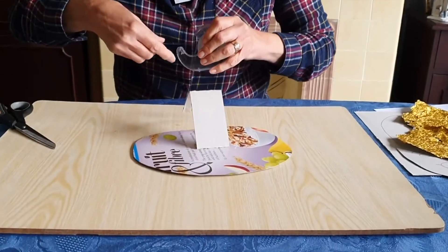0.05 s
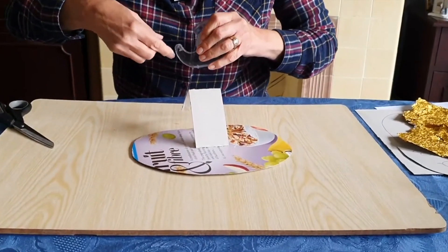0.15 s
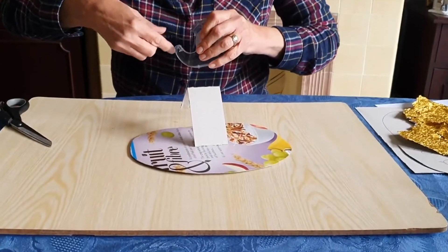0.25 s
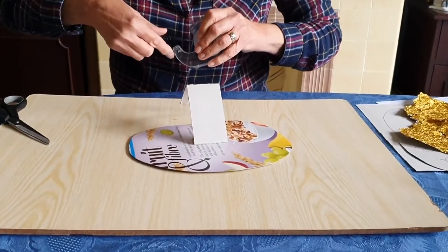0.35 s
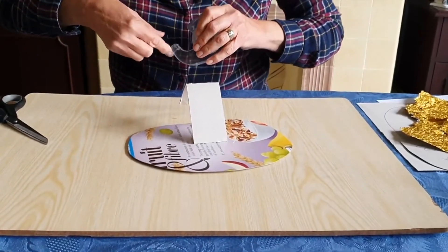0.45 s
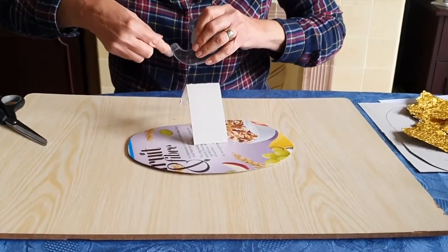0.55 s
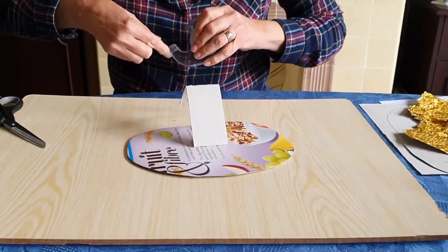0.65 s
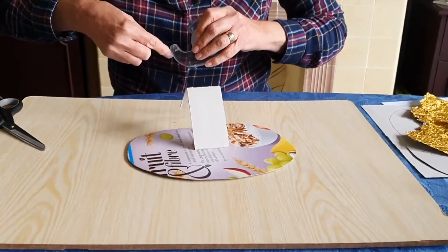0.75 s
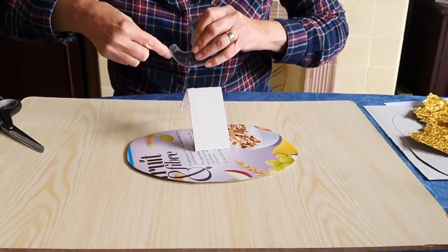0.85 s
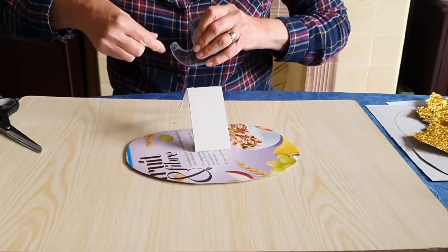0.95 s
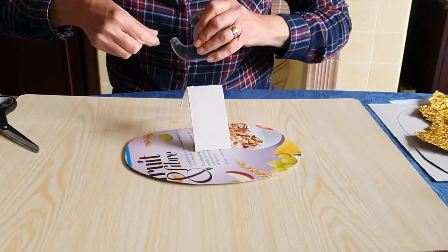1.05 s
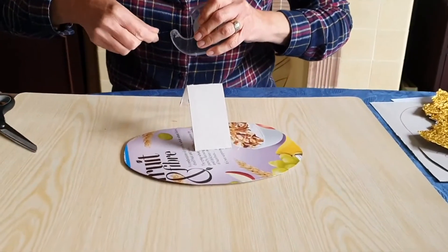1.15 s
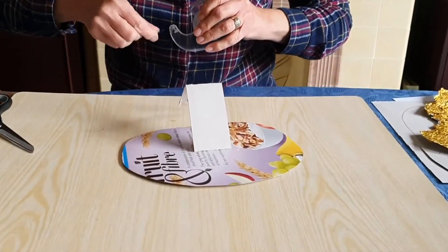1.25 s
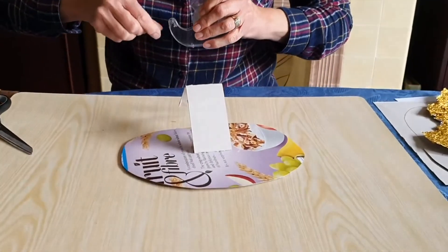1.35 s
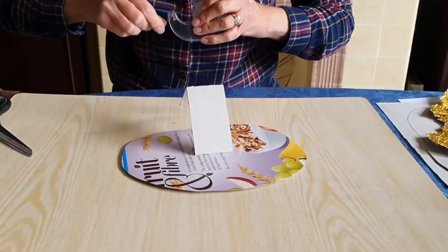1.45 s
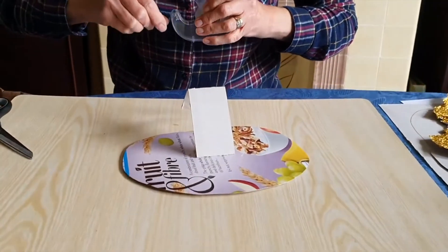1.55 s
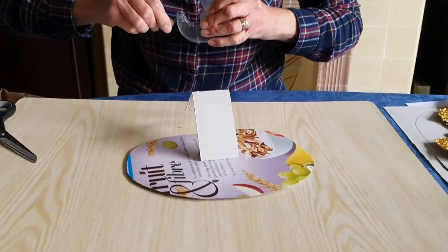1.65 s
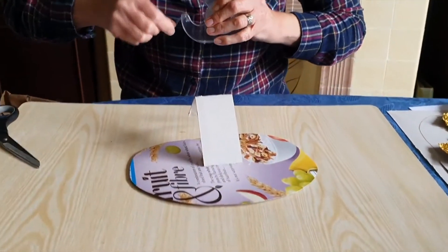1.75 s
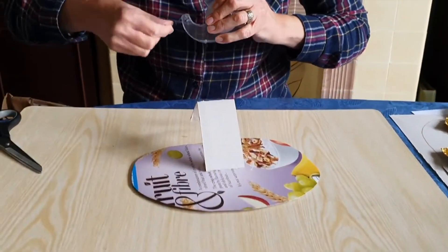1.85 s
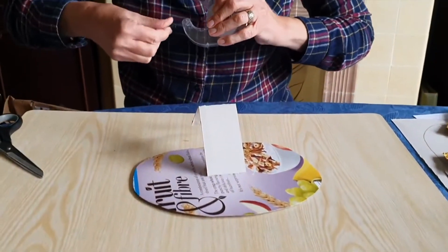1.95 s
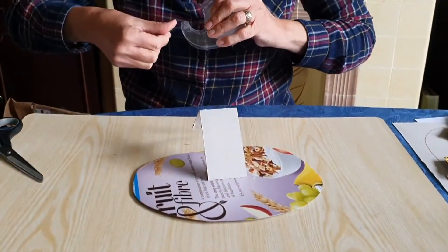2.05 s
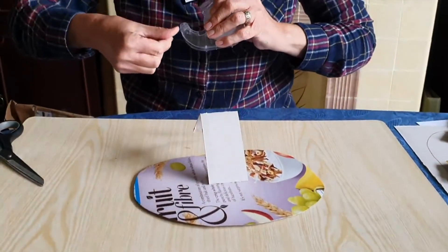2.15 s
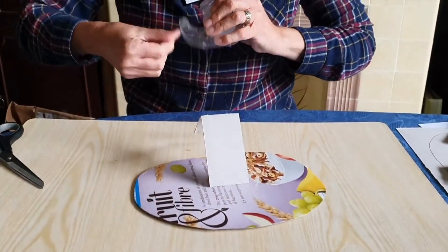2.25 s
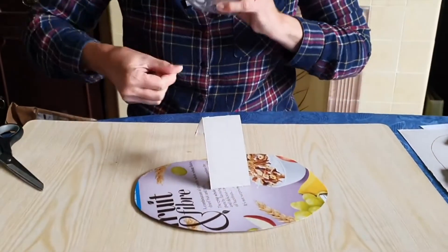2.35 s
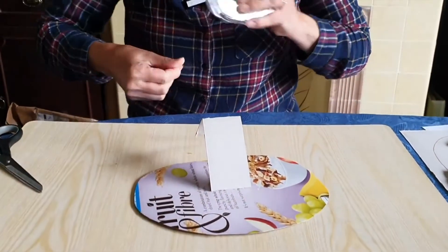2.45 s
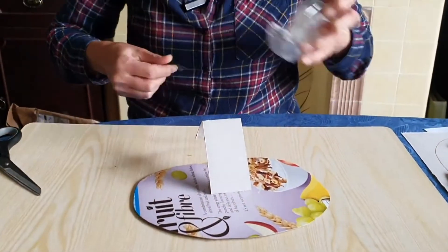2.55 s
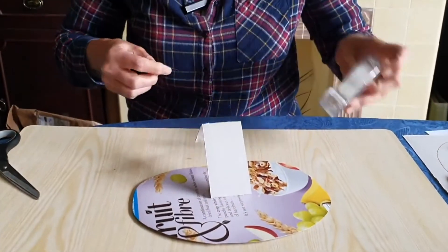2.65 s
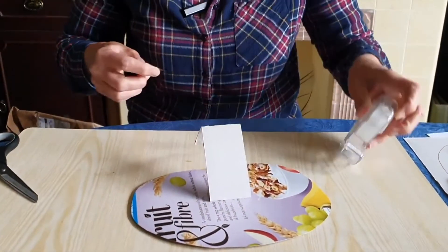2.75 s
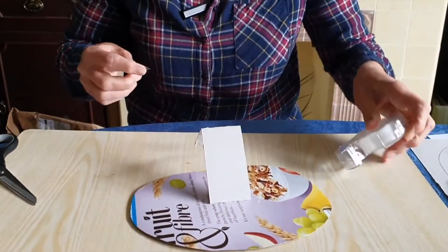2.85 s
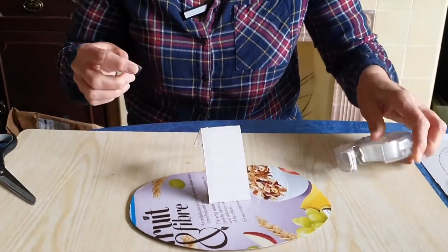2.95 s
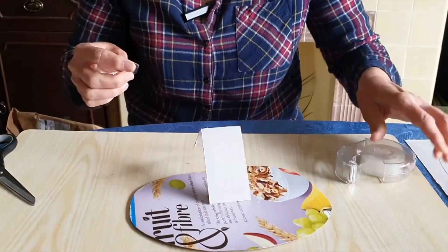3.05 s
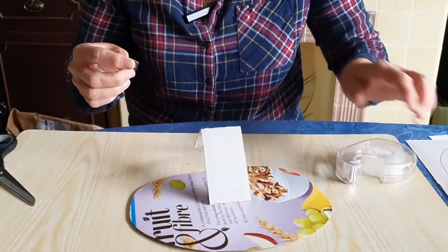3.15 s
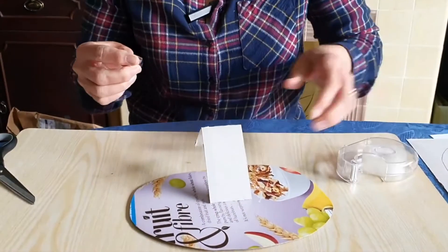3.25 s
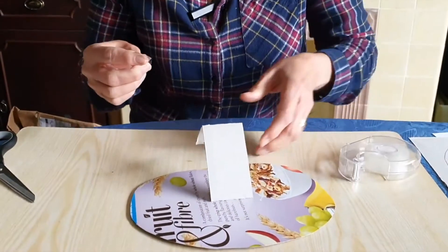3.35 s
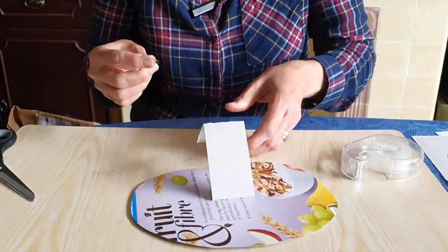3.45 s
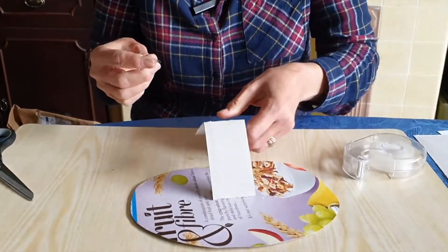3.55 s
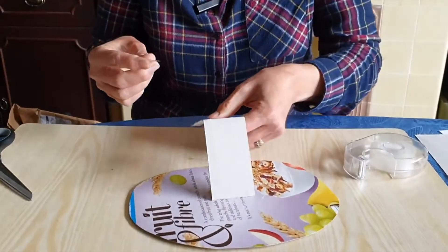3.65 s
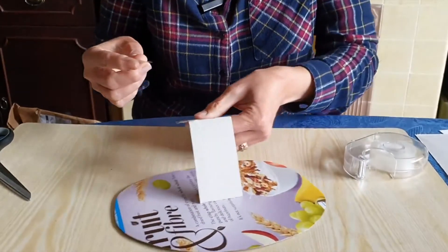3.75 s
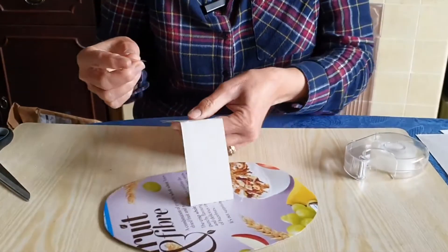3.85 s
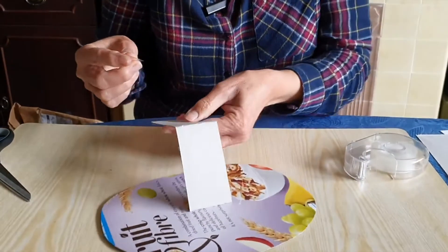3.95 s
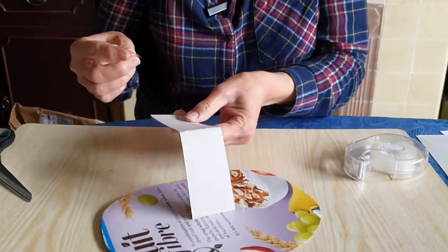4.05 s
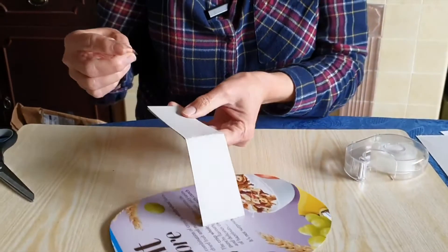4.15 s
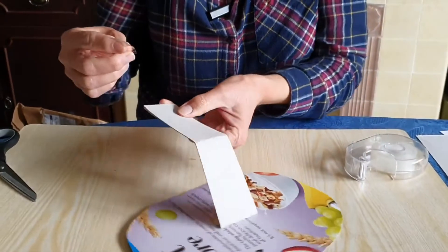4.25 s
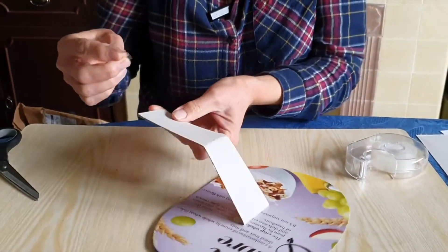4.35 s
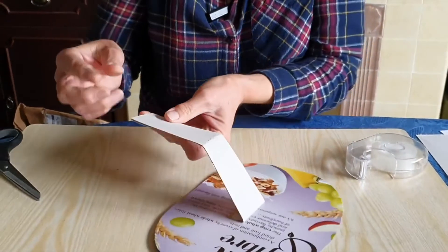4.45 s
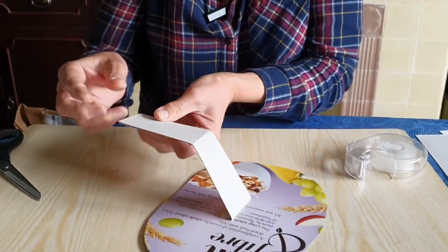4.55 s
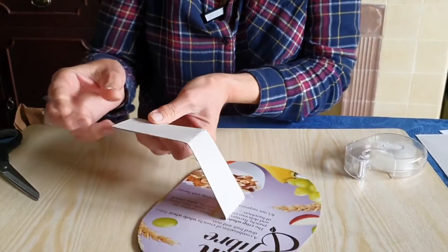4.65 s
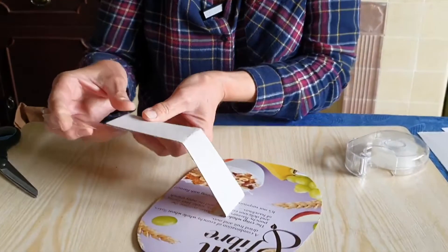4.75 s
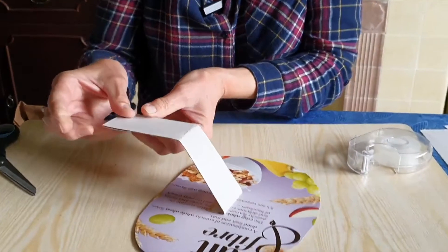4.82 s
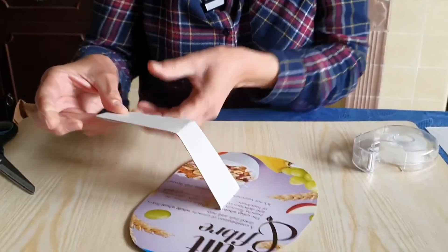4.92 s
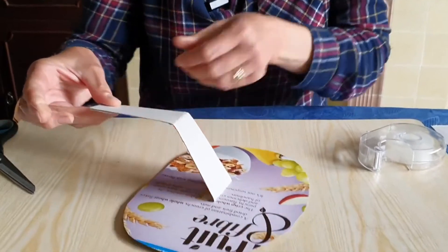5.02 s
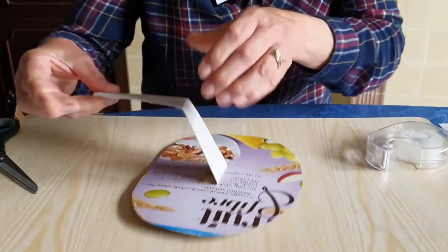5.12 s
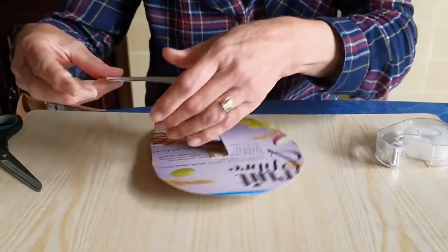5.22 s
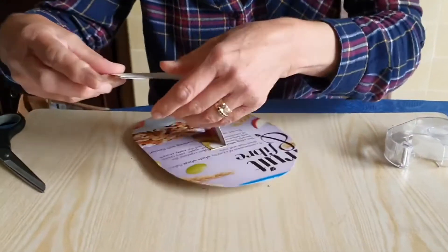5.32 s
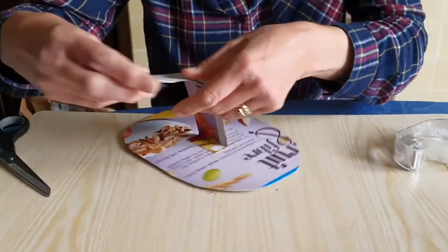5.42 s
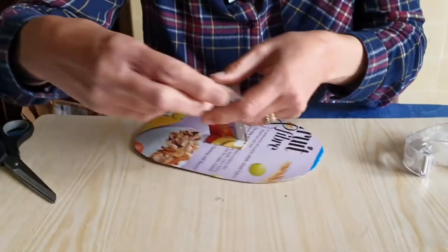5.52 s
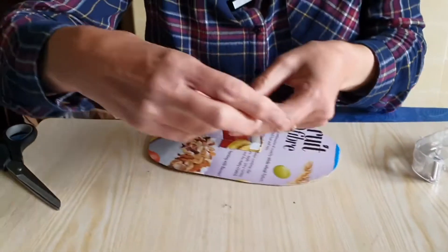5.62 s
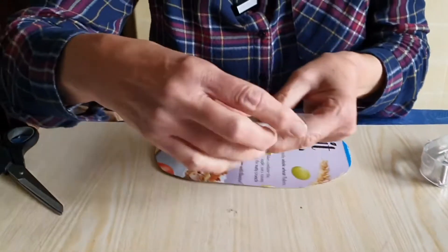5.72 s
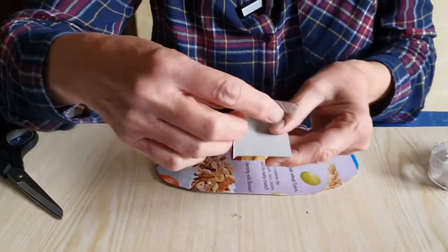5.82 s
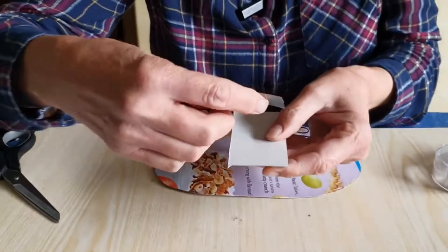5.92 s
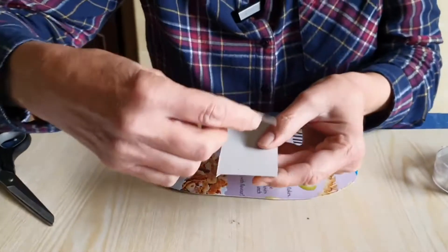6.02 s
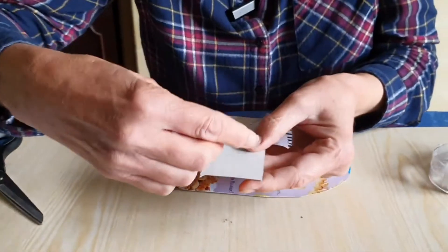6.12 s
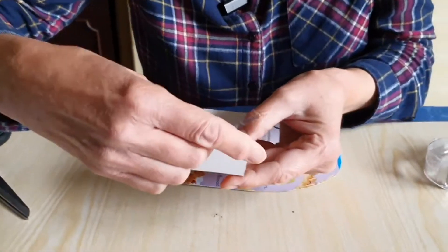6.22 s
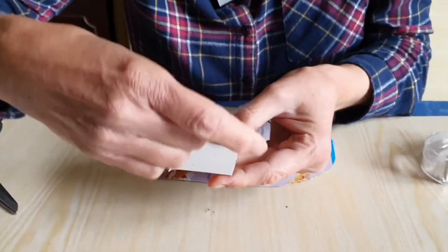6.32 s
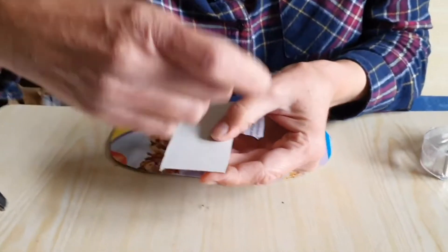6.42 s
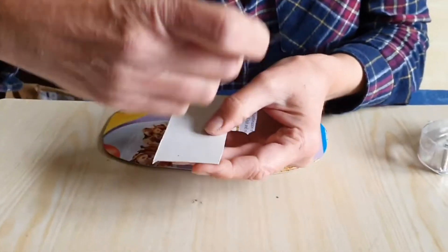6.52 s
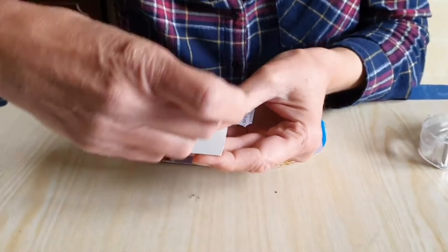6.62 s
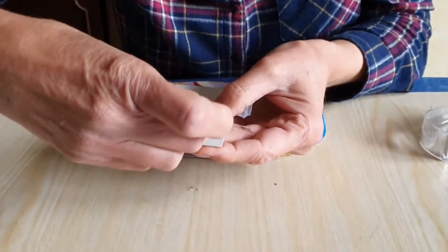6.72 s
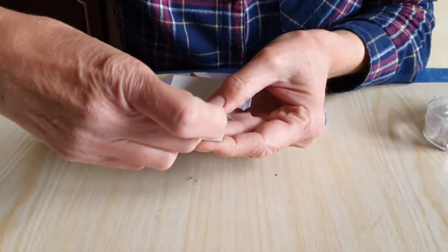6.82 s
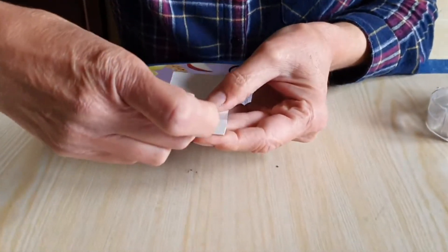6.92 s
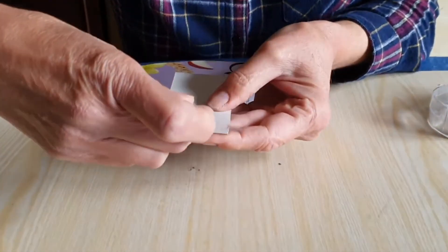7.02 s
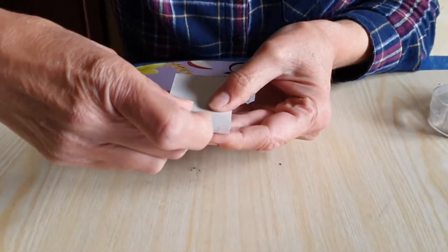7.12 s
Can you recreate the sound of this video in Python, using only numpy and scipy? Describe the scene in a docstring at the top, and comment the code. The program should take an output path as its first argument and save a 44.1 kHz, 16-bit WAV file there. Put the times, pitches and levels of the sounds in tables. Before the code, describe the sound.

In a quiet, small, lively room, heard in stereo from an arm's length, a faint tape rasp opens the scene. Fingers rub plastic with tiny squeaks and a light knock around 0.3-0.4 s, then the tape peels with a crisp, bright rasp and sharp snaps at 0.55-0.76 s. Near quiet follows, with barely audible handling from 1.7 s and a thin, high tearing snap at 2.28 s. Small plastic rattles and squeaks lead to the dispenser landing on wood: a loud, hard clack at 2.8 s, with further knocks at 2.95 and 3.04 s. From 3.7 s cardboard slides over the table in soft, dry, hissing strokes, most active at 5-5.5 s. From 5.7 s light card ticks and fingertip taps mix with dull bumps, a firmer low thud at 6.83 s, and a final tick, thud and rub around 7 s.

```python
"""A short rasp of sticky tape comes first: it is picked at, peeled and torn off a small plastic dispenser,
which is then put down on a wooden table. A cardboard model slides round on it; fingers tap and press tape on.
Blows ring film, shell or card; shaped noise makes rasps and rubs, wavering tones the reel's ringing and
squeaks, swings the thuds. A small, lively room; a stereo microphone stands an arm's length away."""
import sys
import numpy as np
from scipy import signal
from scipy.fft import rfft, irfft, next_fast_len
from scipy.io import wavfile
from scipy.ndimage import uniform_filter1d

SR = 44100
rng = np.random.default_rng(int(sys.argv[2]) if len(sys.argv) > 2 else 0)


def master(y):
    """Save y as 16-bit WAV."""
    cut = np.clip(np.atleast_2d(y).T, -1, 1)
    pcm = np.round(cut * 32767)  # scale
    wavfile.write(sys.argv[1], SR, pcm.astype(np.int16))


N = 316461
TIME = np.arange(N) / SR

# Edges of the bands that shape a contact: [Hz]
BAND_EDGES = [300, 700, 1400, 3200, 8000, 16000]


def undb(db):
    """Decibels to gain."""
    return 10 ** (np.asarray(db) / 20)


def unit(x):
    """Scale to rms 1."""
    return x / np.sqrt(np.mean(x ** 2) + 1e-30)


def band(x, lo_hz, hi_hz, order=3):
    """Causal band-pass."""
    edges_hz = [lo_hz, min(hi_hz, SR / 2 - 1)]
    return signal.sosfilt(signal.butter(order, edges_hz, "band", fs=SR, output="sos"), x)


def at_hz(points, hz):
    """Read (Hz, value) points on a log-frequency axis."""
    point_hz, value = np.transpose(points)
    return np.interp(np.log(hz + 1), np.log(point_hz), value)


def colour(x, points):
    """Give a long sound a spectrum, at rms 1."""
    size = next_fast_len(N)
    gain = undb(at_hz(points, np.fft.rfftfreq(size, 1 / SR)))
    return unit(irfft(rfft(x, size) * gain, size)[..., :N])


def resonate(x, modes):
    """Sum of damped resonances, each set by pitch, width and level."""
    ring = 0
    for hz, width_hz, db in modes:
        b, a = signal.iirpeak(hz, hz / width_hz, fs=SR)
        ring = ring + undb(db) * signal.lfilter(b, a, x)
    return ring


def walk(rate):
    """Smooth random wandering at rms 1, with a given number of steps a second."""
    step = int(SR / rate)
    held = np.repeat(rng.standard_normal(N // step + 1), step)
    return unit(uniform_filter1d(held, step)[:N])


def pair(size, alike):
    """Left and right noise with a shared part."""
    noise, alike = rng.standard_normal((3, size)), np.clip(alike, 0, 1)
    return np.sqrt(alike) * noise[2] + np.sqrt(1 - alike) * noise[:2]


def pan(db):
    """Left and right gains for a left-minus-right level difference."""
    return undb(np.array([[db], [-db]]) / 2)


def grains(rate, spread_db, decay_s):
    """Envelope of many tiny slips of unequal size, at a mean rate a second."""
    sizes = undb(np.clip(spread_db * rng.exponential(size=N), 0, 20))
    tones = (rng.random(N) < rate / SR) * sizes
    return unit(signal.lfilter([1], [1, -np.exp(-1 / (decay_s * SR))], tones))


def add(out, s, sound):
    """Mix a sound in at a time."""
    i = max(int(s * SR), 0)
    out[:, i:i + sound.shape[1]] += sound[:, :N - i]


def gesture(start_s, length_s, attack_s, release_s):
    """Envelope of one hand movement: it gathers speed, holds and dies away."""
    t = TIME - start_s
    return np.clip(t / attack_s, 0, 1) * np.exp(-np.maximum(t - length_s, 0) / release_s)


def gestures(rows, attack_s, release_s, sag_db_per_s=0):
    """Gain of a series of (start s, length s, dB) movements, whose powers add."""
    power = 0
    for s, length, db in rows:
        sagging_db = db - sag_db_per_s * np.clip(TIME - s, 0, length)
        power = power + (gesture(s, length, attack_s, release_s) * undb(sagging_db)) ** 2
    return np.sqrt(power)


def contact_levels(ring_hz, level_db, bass_db, treble_db, droop_db, ring_band_db):
    """Band levels: firm blows reach the bass, sharp ones the treble; the body rounds off both ends."""
    lo, hi = np.array(BAND_EDGES[:-1]), np.array(BAND_EDGES[1:])
    octaves = np.log2(np.sqrt(lo * hi) / 2100)
    slope = np.where(octaves < 0, bass_db, treble_db)
    # the band of the strongest ring stands out
    ring_boost = ring_band_db * ((lo <= ring_hz) & (ring_hz < hi))
    return level_db + slope * np.abs(octaves) - droop_db * octaves ** 2 + ring_boost


def contacts(rows, modes, ring_db, crack_db, crack_s, decay_s, droop_db, ring_band_db,
             alike, lag_s, level_db, room_db):
    """Each contact is a brief chatter that rings a body; returns the direct sound and the room's feed."""
    direct, feed = np.zeros((2, 2, N))
    t = TIME[:SR // 10]
    span = .008 * SR  # levels are powers over 8 ms
    for s, ring_hz, strength_db, bass_db, treble_db, wet_db, pan_db in rows:
        push = pair(len(t), alike) * np.exp(-t / decay_s) * (1 - np.exp(-t / 0.0014))
        # every point of contact favours other modes, one of them most
        struck = [(hz, width, db + 1.3 * rng.standard_normal()) for hz, width, db in modes]
        ring = resonate(push, struck + [(ring_hz, ring_hz / 9, ring_db)])
        body = undb(crack_db) * push * np.exp(-t / crack_s) + ring
        levels = contact_levels(ring_hz, strength_db, bass_db, treble_db, droop_db, ring_band_db)
        hit = 0
        for db, lo, hi in zip(levels, BAND_EDGES, BAND_EDGES[1:]):
            part = band(body, lo, hi, order=4)
            level_gain = np.sqrt(span / np.sum(part ** 2, axis=1, keepdims=True))
            hit = hit + undb(db + level_db) * part * level_gain
        # the sound reaches the nearer side of the microphone first; a positive lag delays the left
        lags = (lag_s, -lag_s)
        hit = np.array([np.interp(t - max(lag, 0), t, side, left=0) for lag, side in zip(lags, hit)])
        add(direct, s, hit * pan(pan_db))
        add(feed, s, hit * undb(wet_db + room_db))
    return np.array([direct, feed])


def tape_snaps():
    """The film unsticks, slips and then tears on the cutter, ringing at each snap."""
    # Snaps: (time [s], strongest ring [Hz], relative level near 2 kHz [dB], slope to the bass [dB/octave],
    # slope to the treble [dB/octave], relative room level [dB], left minus right [dB])
    snaps = [(.027, 520, -45.5, 1, 4, -3, -1), (.281, 1090, -61.5, 2.5, 4, 4, -8),
             (.5505, 12000, -33.5, -1.5, -1, 0.5, -0.5), (.7028, 7510, -25, -2, 1.5, 0, 1),
             (.7245, 7520, -30, 0, 4.5, -1, -3), (.7415, 910, -33, -6.5, 0, 10, 0),
             (.7612, 780, -28, -3, -6, -6.5, -1), (1.658, 12000, -65, -6.5, 6.5, 6, -8),
             (1.765, 5670, -46, -32, 4, 4, 3), (1.969, 5940, -51.5, 0.5, 2, -5.5, -2),
             (1.981, 5930, -54, -1.5, 4.5, 0, 1), (2.138, 2560, -58.5, -14.5, 1.5, 4, 8),
             (2.2485, 7590, -60, -15, 4.5, -4, -5), (2.261, 2560, -48, -4, 0, 8.5, 1),
             (2.2755, 12000, -42, -6, -2, -14, 10), (2.2808, 12200, -27.5, -12.5, 1.5, 4, -9.5)]
    # Resonances of the film: (frequency [Hz], width [Hz], relative level [dB])
    film_modes = [(520, 59, 13.5), (583, 120, -5), (840, 140, -1.5), (1870, 150, 3), (2540, 48, 4.5),
                  (4630, 550, 1.5), (6940, 230, -21)]
    return contacts(snaps, film_modes, ring_db=-3.5, crack_db=1.5, crack_s=0.0026, decay_s=0.0033,
                    droop_db=0.75, ring_band_db=5, alike=0.73, lag_s=-4 / SR, level_db=0.0, room_db=-1.5)


def peel():
    """Threads of glue let go one after another and make the film rasp; the room gets an equal share."""
    # Pulls that peel tape off the reel: (start [s], length [s], relative level [dB])
    pulls = [(0, 0.061, -48), (.55, 0.035, -40.5), (.7, 0.018, -26.5), (.748, 0.038, -35),
             (1.695, 0.081, -60.5), (2.277, .045, -37)]
    # Spectrum of the rasp: (frequency [Hz], relative level per Hz [dB])
    rasp_colour = [(200, -18.5), (400, -15.5), (520, -6.5), (850, -7.5), (1300, -11), (1850, -1),
                   (3000, -9.5), (3800, -10), (4800, -3.5), (7500, 2.5), (8500, -8), (16000, -5)]
    threads = grains(rate=600, spread_db=2.5, decay_s=.0003)
    # the tension slackens as the film comes away
    tension = gestures(pulls, attack_s=.005, release_s=.007, sag_db_per_s=149.5)
    rasp = colour(pair(N, alike=1.0) * threads, rasp_colour) * tension * undb(6.5)
    return np.array([rasp, rasp])


def dispenser_knocks():
    """The reel rattles in its shell, then the shell lands on the table; each knock rings the plastic."""
    # Knocks: (time [s], strongest ring [Hz], relative level near 2 kHz [dB], slope to the bass [dB/octave],
    # slope to the treble [dB/octave], relative room level [dB], left minus right [dB])
    knocks = [(.353, 1084, -58, -1, 0.5, 5.5, -1), (.3975, 2550, -41, 1.5, -5, -3, -1),
              (1.909, 950, -59, 2, -8, -4.5, -1), (2.4544, 1000, -42.5, -2.5, -8, -8, -5),
              (2.5185, 990, -49, 1, -0.5, -17, 0), (2.5625, 4325, -42.5, 0, 1, -13, -3),
              (2.6398, 1080, -27, -0.5, 0, -4, -7.5), (2.7886, 1050, -11, -8, 1, -6.5, -6.5),
              (2.951, 1750, -24.5, -2.5, -1, -5, -4), (3.0424, 2390, -16, 0, 4, -5, -4)]
    # Resonances of the shell: (frequency [Hz], width [Hz], relative level [dB])
    shell_modes = [(395, 50, -30), (630, 50, -15), (988, 60, 5.5), (1090, 110, 3.5), (1223, 29, 3.5),
                   (1760, 280, 0.5), (2010, 150, 4.5), (2240, 300, -7), (2590, 78, -5), (2520, 90, -7.5),
                   (4210, 280, 5), (6800, 2300, -16)]
    return contacts(knocks, shell_modes, ring_db=-0.5, crack_db=-1.0, crack_s=.005, decay_s=0.0028,
                    droop_db=2.5, ring_band_db=8, alike=0.37, lag_s=3 / SR, level_db=1.0, room_db=3.5)


def fingers():
    """Skin catches and slides on the plastic of the dispenser, as noise in tiny slips."""
    # Fingers at work: (start [s], length [s], relative level [dB])
    grips = [(-.03, 0.037, -37.5), (.24, 0.046, -47.5), (.4, 0.15, -46.5), (.63, 0.1, -52), (.8, .2, -65),
             (1.68, 0.37, -63), (2.1, 0.41, -61.5), (2.43, 0.66, -47.5)]
    # Spectrum of skin on plastic: (frequency [Hz], relative level per Hz [dB])
    skin_colour = [(200, -18), (400, -16.5), (600, -9), (780, -21), (1030, -0.5), (1350, -12.5),
                   (1950, 0.5), (2600, -5.5), (3500, -12.5), (6000, -12.5), (9000, -22), (16000, -25.5)]
    catch = grains(rate=400, spread_db=1.5, decay_s=.005)
    grip = gestures(grips, attack_s=0.025, release_s=0.02)
    rub = colour(pair(N, alike=0.11) * catch, skin_colour) * grip * undb(-0.5)
    return np.array([rub, rub * undb(-3.5)])


def ringing_and_squeaks():
    """Wavering tones: the reel of the dispenser rings hollow near 1 kHz, and skin sticks and slips on the card
    in squeaks."""
    # Ringing of the reel and squeaks: (time [s], mean pitch [Hz], peak level [dB], length [s])
    tones = [(.29, 1174, -55, .06), (1.17, 1078, -52.5, 0.018), (1.695, 1790, -54, 0.02),
             (2.393, 953, -50.5, .04), (2.452, 1024, -40.5, 0.051), (2.517, 1031, -42.5, 0.043),
             (2.586, 1118, -49, 0.032), (4.537, 643, -57, 0.054), (6.55, 665, -50.5, 0.043)]
    waver = 0.025  # rms pitch change, as a share of the pitch
    out, wobble = np.zeros((2, N)), walk(130)
    for s, hz, db, length in tones:
        size = int(length * SR)
        pitch = hz * (1 + waver * wobble[int(s * SR):][:size])
        phase = 2 * np.pi * np.cumsum(pitch) / SR
        add(out, s, undb(db) * np.hanning(size) * np.sin(phase) * np.ones((2, 1)))
    return np.array([out, out * undb(-4.5)])


def slide():
    """Card fibres catch on the wood grain: a band near 2 kHz, hiss set for each push, and lone crinkles."""
    # Pushes of the card over the wood: (start [s], length [s], relative level [dB], extra hiss [dB])
    pushes = [(3.689, 0.15, -54, 1.5), (3.939, 0.25, -51, -2.5), (4.202, 0.19, -46.5, -1.5),
              (4.424, 0.16, -49.5, 3), (4.805, 0.066, -50, 2), (4.924, 0.17, -48.5, 3),
              (5.058, 0.2, -42, 4.5), (5.208, 0.08, -37.5, -10), (5.298, 0.22, -43.5, -2),
              (5.57, 0.24, -48, -5), (5.92, 0.33, -58.5, -1), (6.289, 0.66, -56, -13),
              (6.947, 0.21, -47, -9.5)]
    # Spectrum of the rub: (frequency [Hz], relative level per Hz [dB])
    rub_colour = [(300, -31), (650, -21), (900, -17.5), (1400, -10.5), (1750, -1.5), (1950, 6.5), (2130, 7),
                  (2550, -3.5), (3500, -14.5), (4500, -11), (6000, -16.5), (16000, -55)]
    # Spectrum of hiss and crinkles: (frequency [Hz], relative level per Hz [dB])
    hiss_colour = [(1500, -35), (2800, 12), (4400, 8), (5100, 1.5), (7400, 9.5), (8600, 0.5), (11000, 6),
                   (15800, 4)]
    attack_s, release_s = 0.067, 0.041
    pressure = gestures([(s, length, db) for s, length, db, _ in pushes], attack_s, release_s)
    speed = gestures([(s, length, db + extra) for s, length, db, extra in pushes], attack_s, release_s)
    catch = grains(rate=4600, spread_db=6.0, decay_s=0.004) * undb(0.71 * walk(25))
    rub = colour(pair(N, alike=0.31) * catch, rub_colour) * undb(1.66 * walk(60))
    hiss = colour(pair(N, alike=0.11) * catch, hiss_colour) * undb(-1.0)
    creases = grains(rate=120, spread_db=3.0, decay_s=.0004)
    crinkle = colour(pair(N, alike=0.43) * creases, hiss_colour) * undb(-13)
    sound = ((rub + crinkle) * pressure + hiss * speed) * pan(-1)
    return np.array([sound, sound * undb(-3.5)])


def card_ticks():
    """Fingers and card edges tick against one another and ring the cardboard."""
    # Ticks: (time [s], strongest ring [Hz], relative level near 2 kHz [dB], slope to the bass [dB/octave],
    # slope to the treble [dB/octave], relative room level [dB], left minus right [dB])
    ticks = [(3.6817, 7000, -65, -10.5, 0.5, 4.5, -5), (3.8205, 2040, -45, -12.5, -6, 0, -7.5),
             (3.981, 1648, -55, -6.5, -3.5, 1, -2), (4.848, 7000, -56, -4.5, 3.5, -6, -2.5),
             (5.7101, 2080, -49, -11, -13, 1, 5), (5.7545, 12700, -51.5, -0.5, 3, -2.5, 2),
             (5.9126, 1030, -46, -5, 0, -4.5, 2), (6.1127, 7500, -61, -1, 6, 2.5, -2.5),
             (6.1391, 12000, -49, -8, -0.5, 7.5, 6), (6.161, 12200, -37.5, -6.5, 3.5, -7, -2.5),
             (6.3288, 12200, -40, -18.5, -1.5, -4, -4), (6.3375, 2490, -39.5, -20, -8, -9, 2),
             (6.4185, 1600, -43, -5, -13, -5, -4), (6.6564, 2170, -41.5, -5.5, -6.5, -3, -7),
             (6.6893, 2190, -45, -3, -3, -0.5, -6), (6.705, 1880, -52, 2.5, -3.5, 0, -5),
             (6.8255, 353, -50.5, 1, -24, 1, 10), (6.862, 352, -67, 11, 3, -7, 5),
             (6.9996, 1850, -43.5, -2, -5.5, 8.5, -7), (7.0135, 1870, -33.5, -11, -8.5, -6.5, -7.5)]
    # Resonances of the card: (frequency [Hz], width [Hz], relative level [dB])
    card_modes = [(656, 37, 15), (1880, 110, 5.5), (2000, 220, -20.5)]
    return contacts(ticks, card_modes, ring_db=16.5, crack_db=10.5, crack_s=0.0034, decay_s=0.0022,
                    droop_db=0.16, ring_band_db=5, alike=0.27, lag_s=0, level_db=-0.5, room_db=-1.0)


def thuds():
    """Hands and dispenser bump softly: the table top swings in two modes and soon comes to rest."""
    # Dull bumps: (time [s], level of the main swing before its envelope [dB], pitch [Hz])
    bumps = [(.283, -45.5, 194), (.548, -49, 200), (.701, -38.5, 135), (2.789, -24, 246), (2.951, -41, 137),
             (3.075, -32, 103), (4.918, -49, 292), (5.39, -37, 272), (5.411, -45.5, 80), (5.438, -47, 205),
             (5.631, -46, 100), (5.859, -42.5, 208), (6.406, -37.5, 98), (6.417, -37, 268),
             (6.519, -39, 168), (6.586, -44.5, 109), (6.655, -35, 206), (6.8253, -21, 141),
             (6.844, -30.5, 255), (6.863, -29.5, 130), (7.016, -30.5, 130.4), (7.071, -52, 125)]
    decay_cycles = 1.2  # swings in which a bump falls to 1/e
    overtone, overtone_db = 2.35, -7.5  # second mode: multiple of the pitch, relative level
    out, t = np.zeros((2, N)), TIME[:SR // 5]
    for s, db, hz in bumps:
        flesh = unit(band(pair(len(t), alike=1.0), hz / 2, hz * 3, order=2))
        swing = np.sin(2 * np.pi * hz * t)
        second = undb(overtone_db) * np.sin(2 * np.pi * overtone * hz * t)
        envelope = np.exp(-t * hz / decay_cycles) * (1 - np.exp(-t / 0.0003))
        add(out, s, undb(db) * (swing + second + 0.46 * flesh) * envelope)
    return np.array([out, out * undb(-1.5)])


def room(feed):
    """Wall echoes arrive after a short gap and thicken into a tail, alike on both sides only in the bass."""
    # Room decay: (frequency [Hz], time to fall by 60 dB [s])
    decay_times = [(120, 0.28), (400, 0.2), (1000, 0.31), (2500, 0.28), (7000, 0.29), (15000, 0.097)]
    gap_s, build_s, bass_hz = 0.0029, 0.0011, 775
    t = TIME[:int(.6 * SR)]
    onset = 1 - np.exp(-np.maximum(t - gap_s, 0) / build_s)
    edges = np.geomspace(40, 18000, 15)
    response = 0
    for lo, hi in zip(edges, edges[1:]):
        hz = np.sqrt(lo * hi)
        alike = 0.07 + 1.4 / (1 + (hz / bass_hz) ** 2)
        tail = band(pair(len(t), alike), lo, hi)
        tail = tail * onset * np.exp(-np.log(1000) * t / at_hz(decay_times, hz))
        # every band gets energy in proportion to its width
        energy = np.sum(tail ** 2, axis=1, keepdims=True)
        response = response + tail * np.sqrt(2 * (hi - lo) / SR / energy)
    return signal.fftconvolve(feed, response, axes=1)[:, :N] * pan(-1.5)


def background():
    """Low shuffling of arms on the table, over the still room; both are shaped noise."""
    # Arms shifting on the table: (start [s], length [s], relative level [dB])
    shifts = [(.2, 0.83, -65.5), (1.65, 1.1, -70), (2.78, 0.11, -52.5), (2.99, 0.03, -43), (3.7, 0.46, -66),
              (4.3, 1.12, -71), (5.35, 0.58, -60), (6.05, 1.7, -62.5), (6.97, 0.15, -53)]
    # Spectrum of the shuffling: (frequency [Hz], relative level per Hz [dB])
    rumble_colour = [(25, -8), (60, 1.5), (110, -1), (180, -7), (260, -3), (400, -15.5), (800, -16),
                     (2000, -41.5)]
    # Spectrum of the still room: (frequency [Hz], relative level per Hz [dB])
    quiet_colour = [(20, -14.5), (55, 0), (140, -11.5), (260, -12.5), (450, -17), (1000, -20.5),
                    (2000, -18), (4000, -25), (7500, -25), (9000, -34.5), (16000, -24.5)]
    arms = gestures(shifts, attack_s=.06, release_s=0.11)
    rumble = colour(pair(N, alike=0.54), rumble_colour) * arms * undb(2.5 + 2 * walk(12))
    quiet = colour(pair(N, alike=0.29), quiet_colour) * undb(-64.5)
    return rumble + quiet


def scene():
    """All the handiwork, heard directly and through the room, over the background."""
    tape = tape_snaps() + peel()
    rubbing = fingers() + ringing_and_squeaks() + slide()
    direct, feed = tape + dispenser_knocks() + rubbing + card_ticks() + thuds()
    return direct + room(feed) + background()


def record(dry):
    """The recorder clips whatever exceeds full scale and cuts the top above 16 kHz."""
    clipped = np.clip(dry, -1, 1)
    top_cut = signal.ellip(10, .2, 70, 16000, fs=SR, output="sos")
    return signal.sosfilt(top_cut, clipped)


dry = scene()
out = record(dry)
master(out)
```